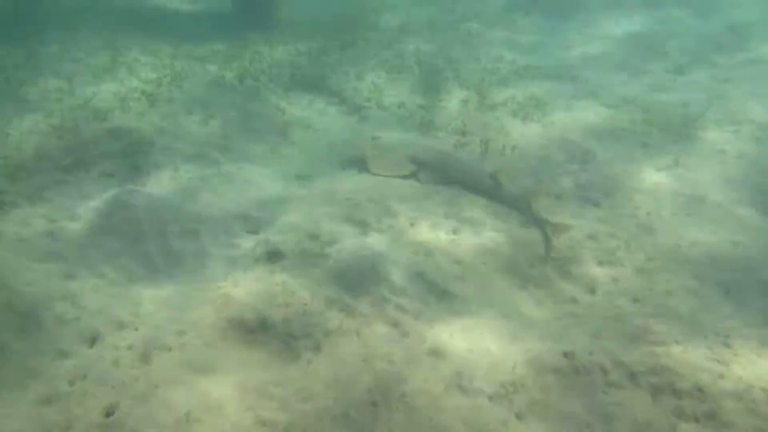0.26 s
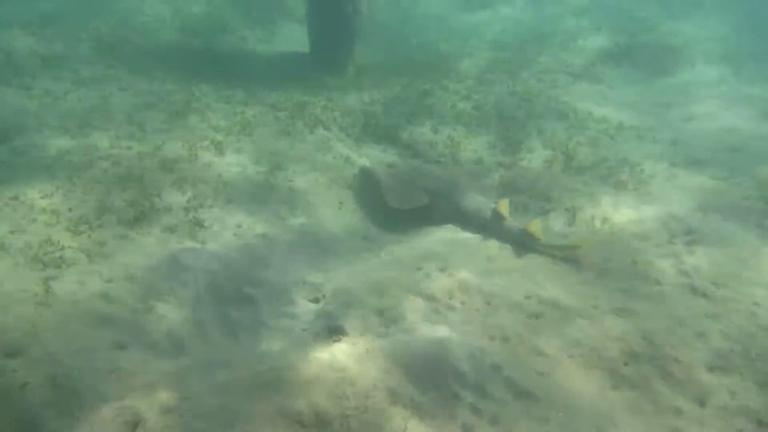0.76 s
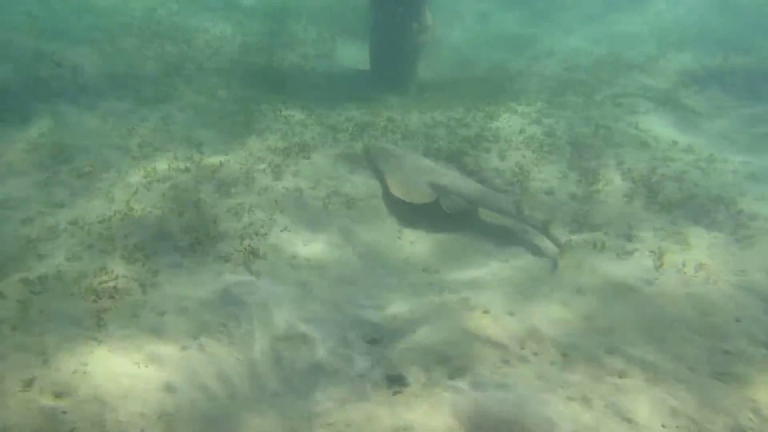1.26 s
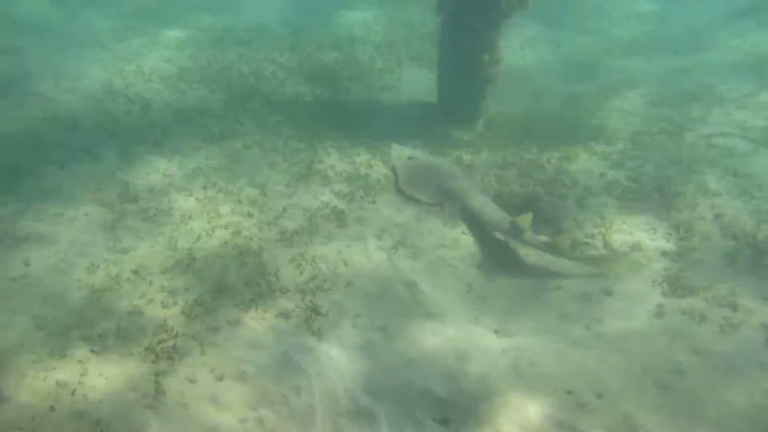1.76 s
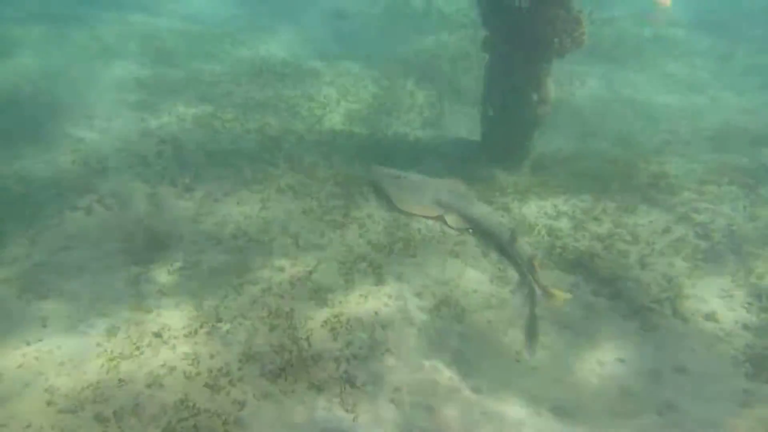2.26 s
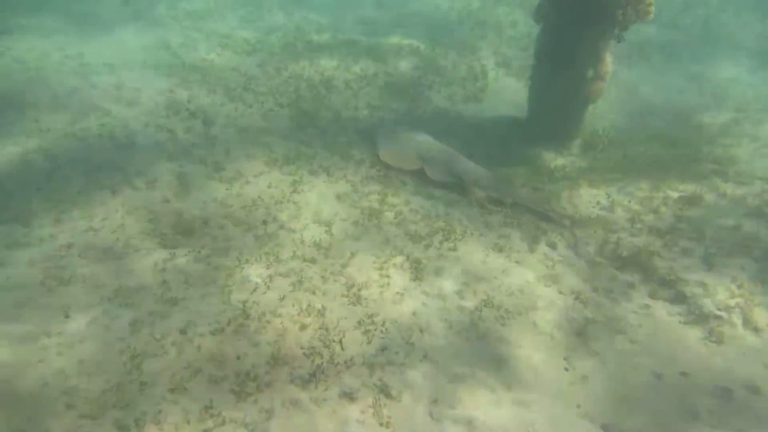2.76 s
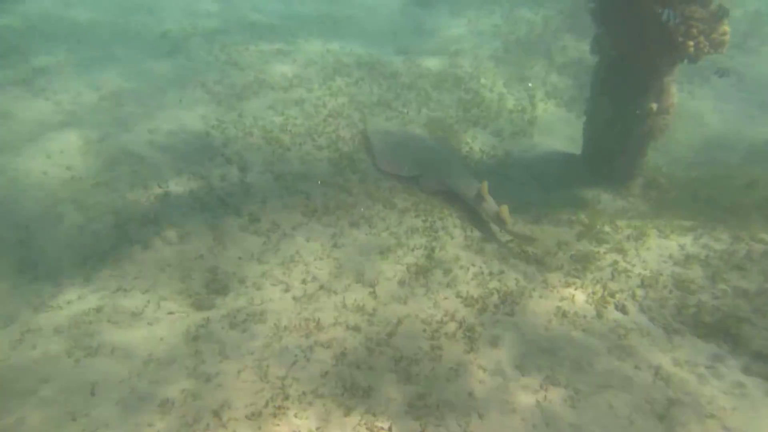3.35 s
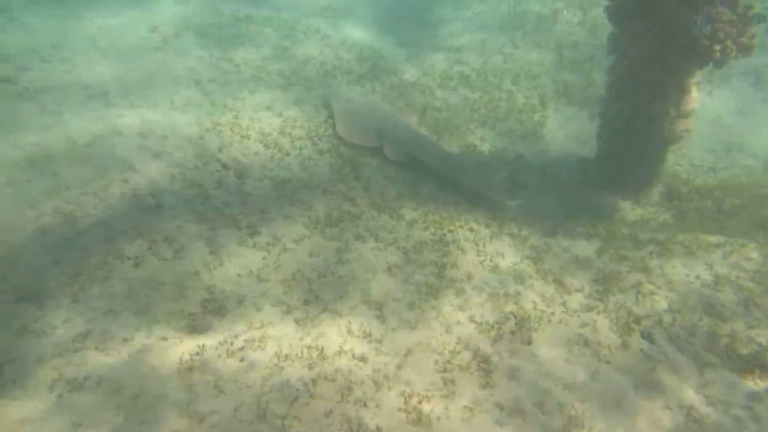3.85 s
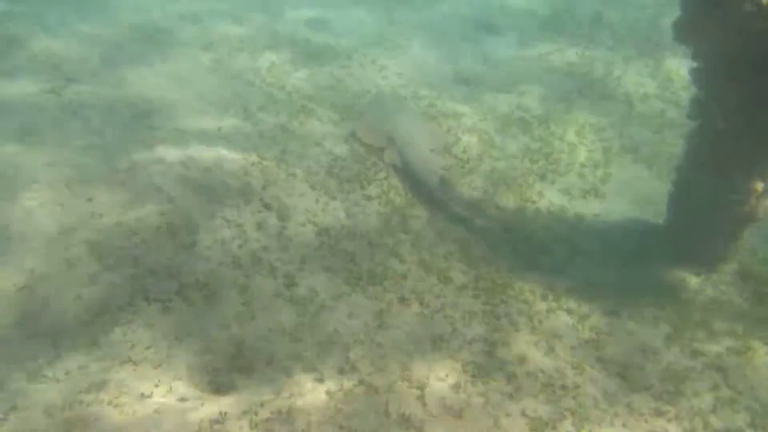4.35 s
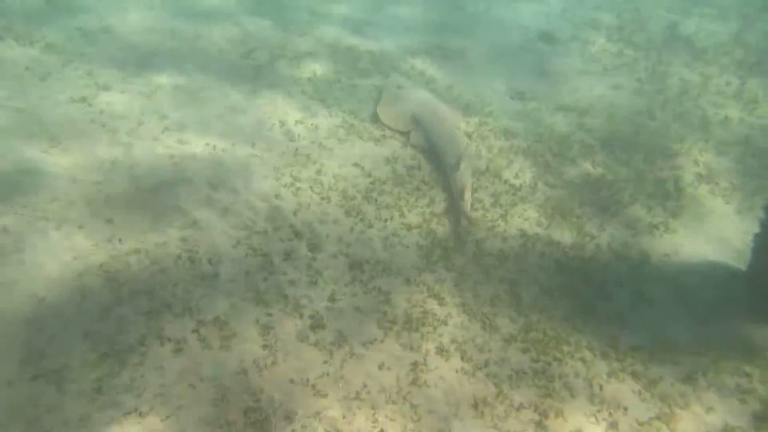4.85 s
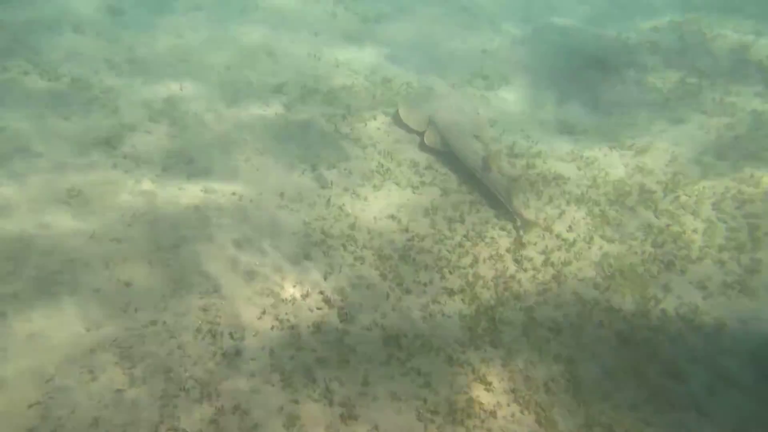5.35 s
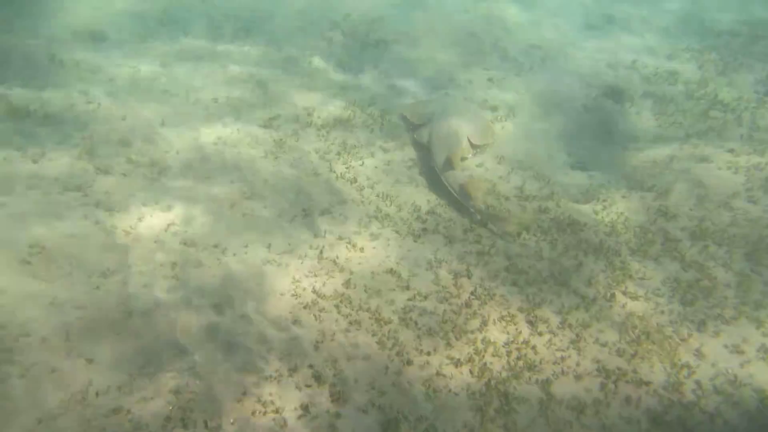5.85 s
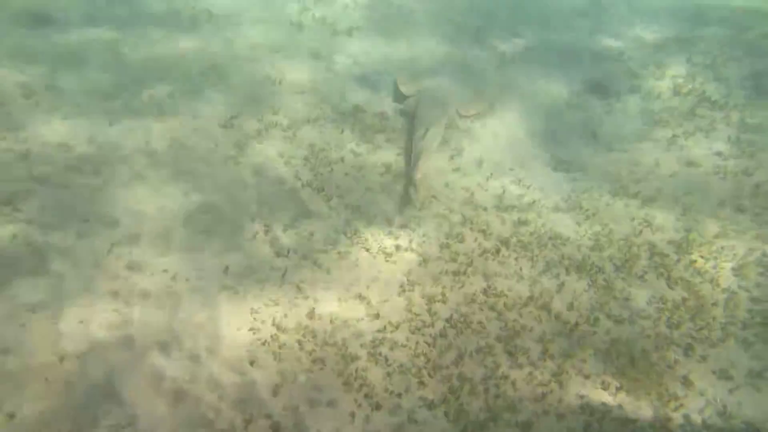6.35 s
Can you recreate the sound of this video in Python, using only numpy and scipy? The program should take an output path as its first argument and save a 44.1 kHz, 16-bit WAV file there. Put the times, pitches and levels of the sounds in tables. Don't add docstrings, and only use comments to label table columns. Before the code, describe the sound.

Heard from inside a sealed case underwater: boomy mid-low humming, woody water knocks, two overloaded slams, gurgling air and a few tiny clicks.

```python
import sys
import numpy as np
from scipy import signal
from scipy.fft import rfft, irfft, next_fast_len
from scipy.io import wavfile
from scipy.ndimage import uniform_filter1d, map_coordinates

SR = 44100
rng = np.random.default_rng(int(sys.argv[2]) if len(sys.argv) > 2 else 0)


def store_wav(level_fs):
    pcm = np.round(np.clip(np.atleast_2d(level_fs), -1, 1) * 32767)
    wavfile.write(sys.argv[1], SR, pcm.T.astype(np.int16))


def boost_factor(decibels):
    exponent = np.asarray(decibels, float) / 20
    return 10 ** exponent


N = 291501


def unit(x):
    return x / np.sqrt(np.mean(x ** 2) + 1e-20)


def curves(rows):
    s, *cols = np.transpose(rows)
    return [np.interp(np.arange(N) / SR, s, c) for c in cols]


def wobble(rate):
    knots = rng.standard_normal(int(N * rate / SR) + 4)
    return map_coordinates(knots, [np.arange(N) * rate / SR])


def filtered(x, response):
    m = next_fast_len(N + 8192)
    return irfft(rfft(x, m) * response(np.fft.rfftfreq(m, 1 / SR)), m)[:N]


def noise(spectrum):
    f, v = np.transpose(spectrum)

    def colour(hz):
        return boost_factor(np.interp(np.log(hz + 1), np.log(f), v, -120, -120))

    return unit(filtered(rng.standard_normal(N), colour))


def add(track, s, sound):
    start = round(s * SR)
    sound = sound[max(-start, 0):]
    part = track[max(start, 0):][:len(sound)]
    part += sound[:len(part)]


def ring(t, hz, db, t60, attack):
    decay = boost_factor(db - 60 * t / t60)
    return decay * (1 - np.exp(-(t / attack) ** 3)) * np.sin(2 * np.pi * hz * t)


# (time [s], depth [dB])
DUCK_EVENTS = [(0.59, 9.5), (0.71, 3.5), (1.31, 3.5), (2.263, 0), (2.398, 0), (2.598, 2), (3.602, 0),
               (3.926, 1.5), (4.242, 5), (4.362, 11), (4.718, 7.5), (4.961, 0), (5.24, -2), (5.323, 8),
               (5.518, 9)]


def gain():
    fast_s, slow_s, slow_share = 0.47, 1.22, 0.23
    s, depth = np.transpose(DUCK_EVENTS)
    t = np.arange(0, N / SR + .01, .002)
    since = np.clip(t - s[:, None], 0, None)
    left = (1 - slow_share) * np.exp(-since / fast_s) + slow_share * np.exp(-since / slow_s)
    ducked = depth[:, None] * left * np.clip(since / 0.0027, 0, 1)
    return curves(np.transpose([t, -ducked.sum(axis=0)]))[0]


# (frequency [Hz], width [Hz])
MIC_PORT = (7700, 550)


def port(f):
    hz, width = MIC_PORT
    return 1 + 1.3 * width ** 2 / (width ** 2 + 4 * (f - hz) ** 2)


# (frequency [Hz], density [dB per Hz])
HISS_SPECTRUM = [(1500, -34.5), (3000, -6.5), (5000, -5.5), (7700, -4.5), (11000, -2.5), (16000, -1.5)]


def hiss():
    return boost_factor(-78.5 + gain()) * filtered(noise(HISS_SPECTRUM), port)


# (time [s], peak level [dB])
SHRIMP_SNAPS = [
    (0.307, -67),
    (2.4558, -62.5),
    (2.753, -52),
    (2.7614, -49),
    (3.928, -48.5),
    (4.6858, -54.5),
    (4.9201, -63.5),
]


def shrimp():
    out, t = np.zeros(N), np.arange(SR // 50) / SR
    for s, db in SHRIMP_SNAPS:
        puff = rng.standard_normal(len(t)) * boost_factor(db - 0.5 - 60 * t / 0.028)
        add(out, s, puff)
        add(out, s + .003, boost_factor(-11.5) * puff)

    def response(f):
        band = 1j * f * 3000 / (7900 ** 2 - f * f + 1j * f * 3000)
        return band ** 2 + .1 * f / (f + 4000)

    return filtered(out, response)


# (time [s], peak level [dB])
DRIVE_TICKS = [
    (0.0702, -30),
    (0.6002, -46),
    (2.8622, -37),
    (3.1444, -37),
    (4.1578, -47.5),
    (4.646, -52),
    (5.9916, -50.5),
]
# (frequency [Hz], level [dB], t60 [s])
DRIVE_MODES = [(1590, 0, .018), (2050, -13, .009), (2550, -14, .011), (2950, -15, .009), (4100, -40, .012),
               (7700, -35, .008)]


def lens_drive():
    out, t = np.zeros(N), np.arange(SR // 20) / SR
    running = np.ones(N)
    for s, db in DRIVE_TICKS:
        add(out, s, sum(ring(t, hz, db + 11.0 + level, t60, .0007) for hz, level, t60 in DRIVE_MODES))
        running[round(s * SR):] *= -1
    whine_hz = 12408
    whine = np.sin(2 * np.pi * whine_hz * np.arange(N) / SR + .8 * wobble(8))
    level_db = -75.5 + gain() + 2.5 * wobble(7.1)
    return out + uniform_filter1d((running + 1) / 2, size=90) * boost_factor(level_db) * whine


# (time [s], peak level [dB], start frequency [Hz], length [s])
AIR_GURGLES = [(1.193, -24, 302, 0.047), (1.267, -20.5, 262, 0.044), (1.974, -25.5, 274, 0.046),
               (2.234, -17.5, 259, 0.055), (2.47, -14, 288, 0.041), (4.11, -23, 227, 0.057),
               (4.184, -23, 247, 0.068), (4.272, -20.5, 280.4, 0.069), (4.596, -30, 277.6, .05),
               (4.671, -22.5, 268, 0.04), (4.765, -28, 272.6, 0.21), (4.754, -17, 399.5, 0.14),
               (5.151, -28, 336, 0.089), (6.54, -17.5, 289.5, 0.076)]


def gurgles():
    out = np.zeros(N)
    rise_hz, flutter_hz = 65, 35
    for s, db, start_hz, length in AIR_GURGLES:
        u = np.linspace(0, 1, int(length * SR))
        phase = 2 * np.pi * np.cumsum(start_hz + rise_hz * u) / SR
        swell = boost_factor(-8 * u) * np.sin(np.pi * u ** .5)
        flutter = 1 + 0.42 * np.sin(2 * np.pi * (flutter_hz * length * u + rng.random()))
        add(out, s, boost_factor(db) * flutter * swell * np.sin(phase))
    return out


# (time [s], slosh level [dB], deep heave level [dB], length [s])
SEA_SWELLS = [(0.007, -24.5, -45, 0.36), (0.413, -35.5, -27.5, 0.11), (0.55, -30.5, -33, 0.064),
              (1.238, -48, -54, 0.18), (1.597, -39, -18.5, 0.037), (1.869, -25.5, -37.5, 0.6),
              (2.257, -18, -32.5, 0.2), (2.55, -20, -63, .1), (2.932, -37.5, -41.5, .1),
              (3.876, -21.5, -33.5, 0.089), (4.144, -23, -50, 0.15), (4.613, -26.5, -45.5, 0.29),
              (4.956, -40, -45, 0.087), (5.095, -30, -40.5, 0.26), (6.03, -59, -40.5, 0.13),
              (6.427, -26.5, -46, 0.23)]


def swells():
    t = np.arange(N) / SR
    power = sum(boost_factor([[2 * slosh_db], [2 * heave_db]]) * np.exp(-2 * np.abs(t - s) / length * 2)
                for s, slosh_db, heave_db, length in SEA_SWELLS)
    return np.sqrt(power)


# (time [s], strength [dB])
FLOW_STRENGTH = [(0, -3), (0.5, 0.5), (0.9, -4), (1.5, 3), (1.9, 1), (2.4, 1), (2.7, 1.5), (3.1, -1),
                 (3.5, 1), (3.8, -4), (4.2, 1), (4.6, 7.5), (5, 2), (5.4, 1), (5.75, -0.5), (6.1, -1),
                 (6.35, -0.5), (6.6, -1.5)]


def flow_db():
    return curves(FLOW_STRENGTH)[0]


# (frequency [Hz], density [dB per Hz])
RUMBLE_SPECTRUM = [(10, -12), (22, -3), (50, -3), (75, -8), (120, -17), (200, -28), (400, -60)]


def rumble(heaving):
    surges = boost_factor(2 * wobble(14))
    steady = boost_factor(-36 + gain() + 0.4 * flow_db())
    return np.hypot(steady, boost_factor(2.0) * heaving) * unit(surges * noise(RUMBLE_SPECTRUM))


# (frequency [Hz], density [dB per Hz])
SLOSH_SPECTRUM = [(60, -41.5), (140, -5), (230, -4), (330, 3.5), (420, -1.5), (700, -50.5)]


def slosh(lumps, sloshing):
    gulps = boost_factor(5 * wobble(25))
    steady = boost_factor(-48 + gain() + 3.9 * flow_db())
    return np.hypot(steady, boost_factor(-5.5) * sloshing) * unit(gulps * lumps ** 0.28 * noise(SLOSH_SPECTRUM))


# (frequency [Hz], width [Hz], level [dB])
SHELL_MODES = [
    (455, 102, 2.5),
    (669.6, 110, -19),
    (503, 13, -10),
    (940, 230, -34),
    (1270, 1700, -40),
    (1491, 39, -42),
]
# (frequency [Hz], density [dB per Hz])
RUSH_SPECTRUM = [(400, -40), (800, -3.5), (1000, 5), (1650, -9), (1800, -23.5), (2300, -23.5),
                 (2500, -29.5), (3700, -36), (4200, -47.5), (7000, -97)]


def rush(lumps):
    def upper(f):
        return 1.5 + sum(1.3 * w * w / (w * w + 4 * (f - c) ** 2) for c, w, db in SHELL_MODES[3:])

    flutter = boost_factor(1.5 * wobble(52))
    return boost_factor(-52.5 + gain()) * unit(lumps ** .5 * flutter * filtered(noise(RUSH_SPECTRUM), upper))


def shell(f):
    modes = 0
    for k, (c, w, db) in enumerate(SHELL_MODES[:3]):
        modes = modes + (-1) ** k * boost_factor(db) * (1j * f * w / (c * c - f * f + 1j * f * w)) ** 2
    return modes * f / (f + 300) / (1 + 1j * f / 700 - (f / 700) ** 2) ** 2


def hum(lumps):
    drumming = filtered(lumps * rng.standard_normal(N), shell)
    return boost_factor(-19 + gain() + flow_db()) * unit(drumming)


def flow():
    lumps = boost_factor(2.2 * wobble(45) + .7 * wobble(12))
    sloshing, heaving = swells()
    return rumble(heaving) + slosh(lumps, sloshing) + rush(lumps) + hum(lumps)


# (time [s], peak level [dB], push length [ms])
HOUSING_THUDS = [(0.049, -17, 2.2), (0.352, -15.5, 3.2), (0.652, -13.5, 2.1), (1.274, -15.5, 2.6),
                 (1.548, -37, 2.5), (1.596, -9, 8.1), (1.761, -14.5, 1.2), (2.29, -20, 4.8),
                 (2.419, -16.5, 4.6), (2.576, -15, 2.5), (2.862, -8.5, 4.8), (2.951, -14.5, 3),
                 (3.22, -24.5, 1.5), (3.518, -16, 4.4), (3.921, -8, 1.3), (4.66, -11.5, 2.3),
                 (4.938, -10, 4.3), (5.208, -14, 3.9), (5.521, -14, 2), (6.195, -15.5, 2.05),
                 (6.259, -13, 1.4)]


def thuds():
    out, t = np.zeros(N), np.arange(SR // 8) / SR
    for s, db, ms in HOUSING_THUDS:
        u = t / (max(ms, 2) / 6000)
        slow = t / 0.026
        push = (u / 4) ** 4 * np.exp(4 - u)
        rebound = 0.19 * slow ** 2 * np.exp(2 - 2 * slow)
        add(out, s - .0015, boost_factor(db - 8.5) * (push - rebound))
    return out


# (time [s], peak level [dB])
GLANCING_TAPS = [
    (0.256, -26),
    (2.56, -15.5),
    (2.776, -26),
    (3.361, -26),
    (3.679, -22.5),
    (4.935, -29),
    (5.241, -8.5),
    (5.892, -41.5),
]


def taps():
    out, t = np.zeros(N), np.arange(SR // 8) / SR
    for s, db in GLANCING_TAPS:
        add(out, s - .001, ring(t, SHELL_MODES[1][0], db, .04, .0018))
    return out


# (time [s], peak level [dB], frequency [Hz], t60 [s])
WATER_KNOCKS = [(0.56, -7.5, 504, 0.011), (0.5889, 3, 471.3, 0.042), (0.71, -2.5, 472.4, 0.04),
                (1.312, -6, 467.3, 0.095), (1.602, -6.5, 429, 0.049), (1.682, -11.5, 436, 0.061),
                (1.827, -9, 437, 0.098), (2.146, -6.5, 427, 0.046), (2.253, -10.5, 407, 0.02),
                (2.393, -4.5, 420.4, 0.05), (2.45, -10.5, 470, 0.089), (2.528, -11.5, 449, 0.067),
                (2.56, -6, 455, 0.031), (2.598, -6.5, 445, 0.074), (2.861, -5.5, 468.5, 0.045),
                (3.224, -3, 439, 0.027), (3.256, -9.5, 403.4, 0.053), (3.601, 0, 455, 0.04),
                (3.681, -10.5, 491, 0.075), (3.926, -6, 459, 0.07), (4.242, 0, 454.8, 0.045),
                (4.361, 3, 476.6, 0.036), (4.708, -5.5, 468, 0.03), (4.721, 0.38, 450.8, 0.057),
                (4.933, -6.5, 436, 0.039), (4.96, -7, 469.6, 0.07), (5.241, -2.5, 479, 0.04),
                (5.322, -4.5, 464, 0.048), (5.521, 2.5, 474.3, 0.04), (6.603, -15.5, 469, 0.1)]
# (time [s], peak level [dB], frequency [Hz])
WATER_LAPS = [(-0.0115, -8.5, 455), (0.102, -16, 470), (2.665, -11, 457), (0.374, -12, 448),
              (0.459, -15, 499), (0.487, -11.5, 442), (1.061, -15.5, 455), (1.862, -15, 455),
              (1.388, -14, 465), (1.516, -14.5, 411), (1.94, -12.5, 507.7), (2.03, -12, 460.6),
              (2.084, -11.5, 421.5), (2.296, -10.5, 476.5), (2.418, -16, 510.4), (2.49, -14, 461),
              (2.774, -20.5, 437), (2.896, -12.5, 496), (3.361, -17.5, 490), (4.21, -14.5, 435.3),
              (4.285, -10.5, 423.6), (4.633, -20, 461), (4.684, -10, 462.5), (4.82, -14.5, 481.4),
              (4.91, -11.5, 437), (5.064, -10, 450), (5.808, -24.5, 482), (5.89, -20.5, 438),
              (6.473, -11, 395.5), (6.519, -13, 503)]


def knocks():
    out, t = np.zeros(N), np.arange(SR // 8) / SR
    knock_attack_s, lap_attack_s, lap_t60_s = .0037, 0.004617, 0.11
    blows = [(*row, knock_attack_s) for row in WATER_KNOCKS]
    blows += [(*row, lap_t60_s, lap_attack_s) for row in WATER_LAPS]
    for s, db, hz, t60, attack in blows:
        attack = attack * (1 + .1 * max(-db - 5, 0))
        upper_db = db - 19 - 2 * rng.standard_normal()
        upper = ring(t, SHELL_MODES[1][0], upper_db, 0.054, 0.32 * attack)
        add(out, s - .75 * attack, ring(t, hz, db + 7.0, t60, attack) + upper)
    return out


# (time of the crest [s], peak level [dB], suction before it [0-1])
HARD_SLAMS = [
    (.5827, 2.2, .1),
    (2.2631, 4.4, .4),
]


def slams():
    out, t = np.zeros(N), np.arange(SR // 10) / SR - .005
    envelope = np.where(t < 0, np.exp(-(t / 0.0031) ** 2), boost_factor(-60 * t / 0.0088))
    swing = envelope * np.cos(2 * np.pi * SHELL_MODES[0][0] * t)
    shove = np.exp(-(t / np.where(t < 0, .001, .0025)) ** 2)
    for s, db, suction in HARD_SLAMS:
        pull = suction * np.exp(-((t + 0.00057) / 0.001) ** 2)
        add(out, s - .005, boost_factor(db) * (.6 * swing + .4 * shove - pull))
    return out


def scene():
    background = hiss() + shrimp() + lens_drive() + gurgles()
    water = flow() + thuds() + taps() + knocks() + slams()
    return (background + water)[None]


def low_pass(x):
    return signal.sosfilt(signal.butter(12, 15840, fs=SR, output="sos"), x)


# (frequency [Hz], width [Hz])
INPUT_NOTCH = (1098, 24)


def record(dry):
    x = filtered(dry[0], lambda f: 1j * f / (1j * f + 18))
    over = np.clip(np.abs(x) - .49, 0, None)
    squeeze = .09 * over + .1 * np.clip(over - .3, 0, .8) ** 2
    x = np.clip(x - np.sign(x) * squeeze, -1, 1)
    hz, width = INPUT_NOTCH
    x = filtered(x, lambda f: (hz ** 2 - f * f) / (hz ** 2 - f * f + 1j * f * width))
    return low_pass(x[None])


dry = scene()
out = record(dry)
store_wav(out)
```